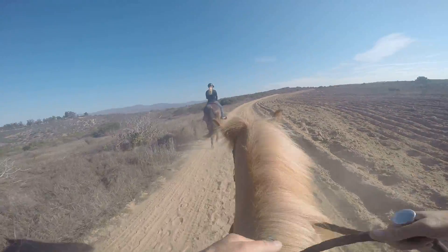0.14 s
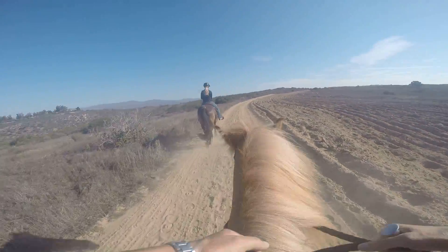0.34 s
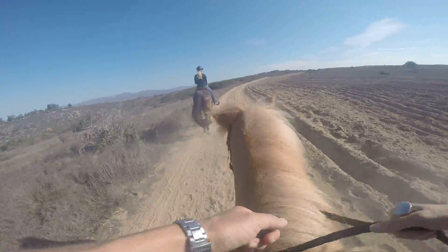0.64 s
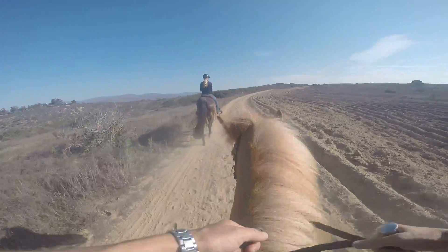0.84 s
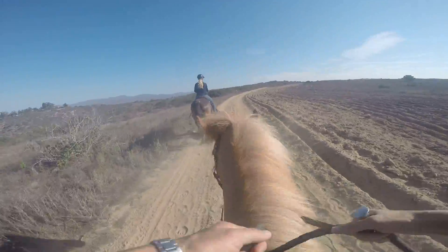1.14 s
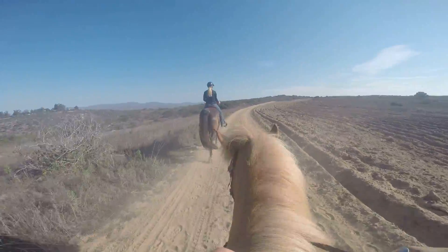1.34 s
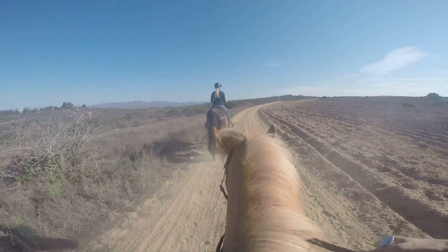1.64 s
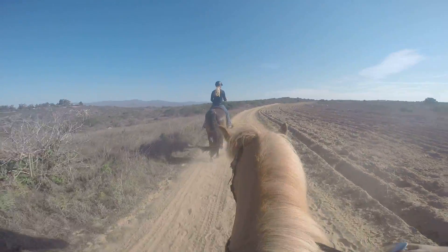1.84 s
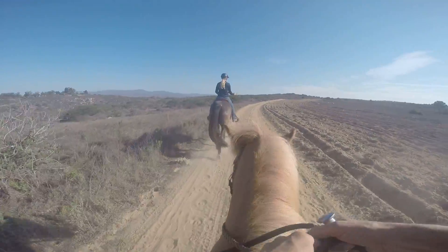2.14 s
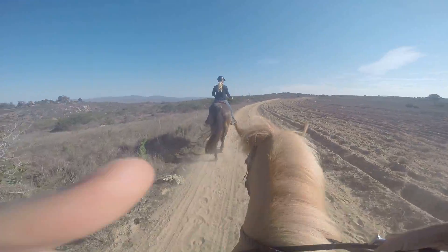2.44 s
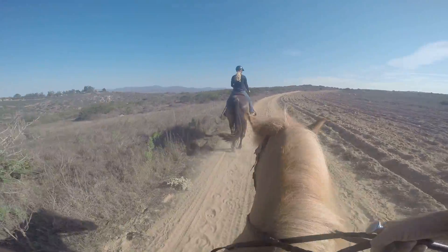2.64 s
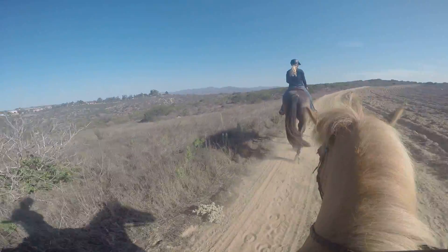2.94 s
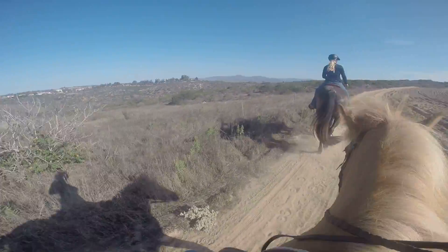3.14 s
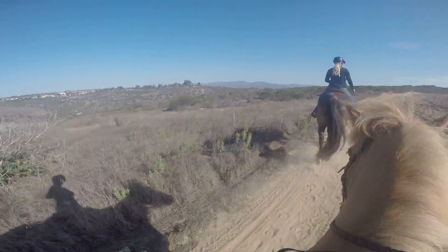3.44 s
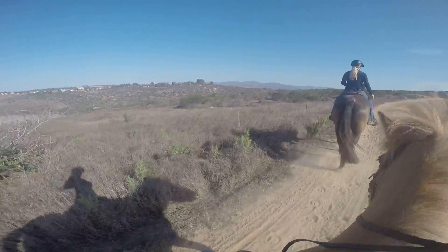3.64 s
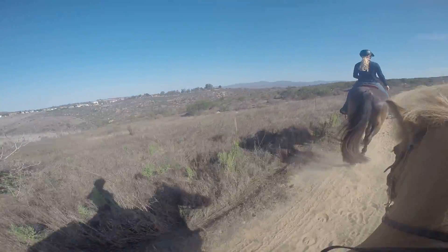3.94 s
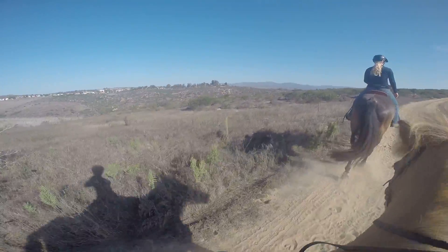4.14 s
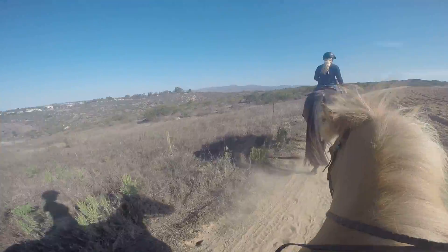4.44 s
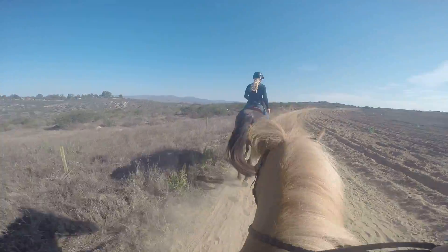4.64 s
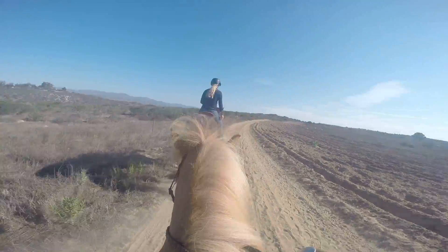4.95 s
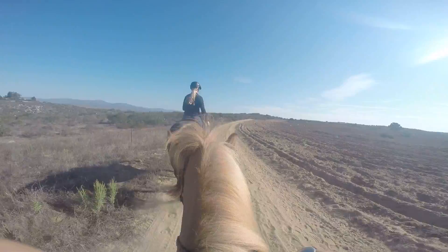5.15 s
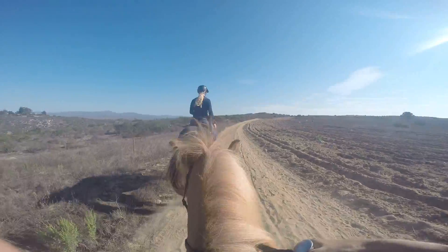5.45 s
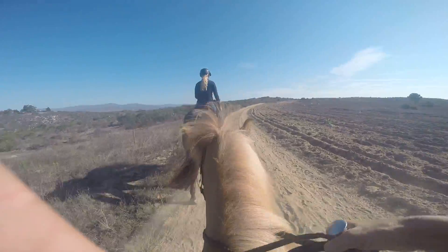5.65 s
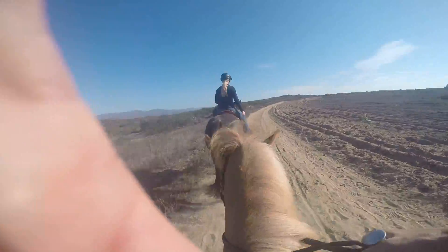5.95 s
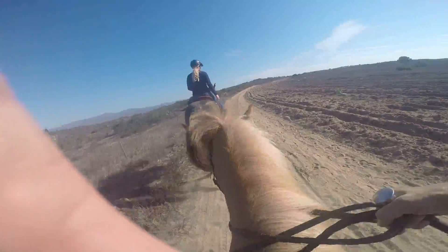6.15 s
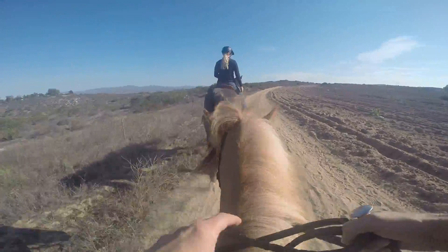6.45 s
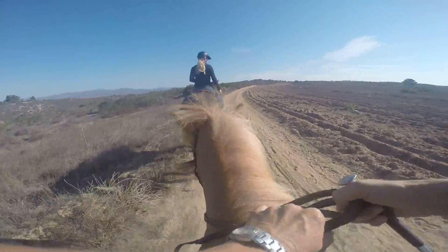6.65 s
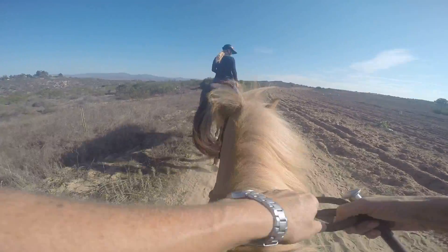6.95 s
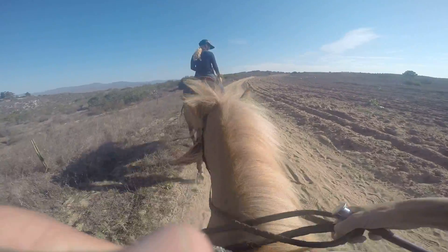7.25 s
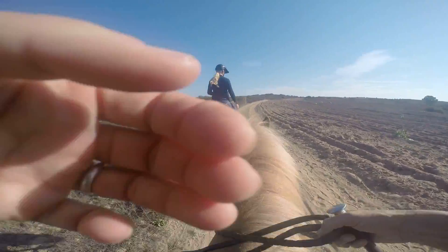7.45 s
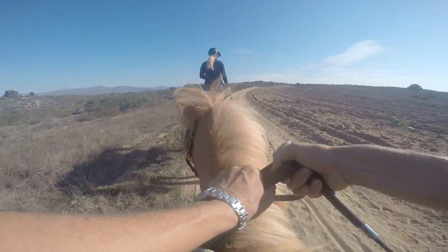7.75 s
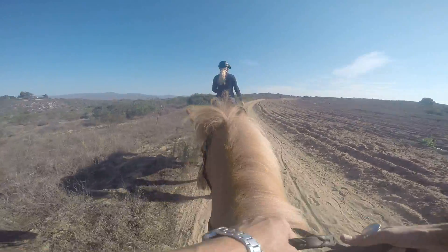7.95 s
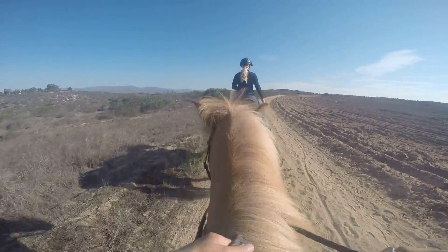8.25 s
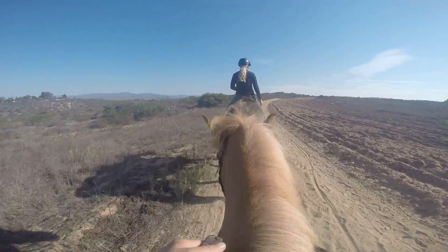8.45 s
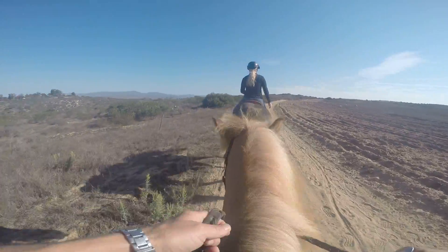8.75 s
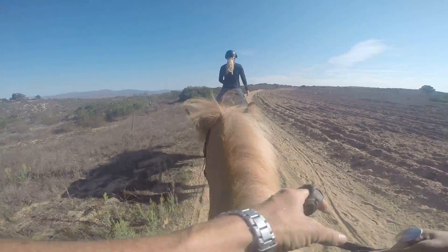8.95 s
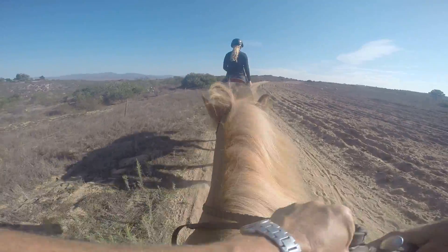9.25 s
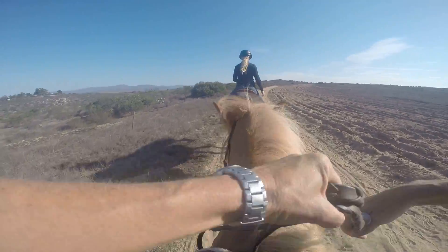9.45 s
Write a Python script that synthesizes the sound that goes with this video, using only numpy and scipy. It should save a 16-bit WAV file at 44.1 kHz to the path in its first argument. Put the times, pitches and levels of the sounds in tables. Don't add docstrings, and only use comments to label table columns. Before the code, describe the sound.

Low muffled trotting thumps on a cased camera give way to hard finger taps and scrapes on plastic, then thump again and fade.

```python
import sys
import numpy as np
from scipy import signal
from scipy.fft import rfft, irfft, next_fast_len
from scipy.io import wavfile

SR = 44100
rng = np.random.default_rng(int(sys.argv[2]) if len(sys.argv) > 2 else 0)


def waveform_to_disk(signal):
    frames = np.transpose(np.atleast_2d(signal))
    scaled = np.clip(frames, -1, 1) * 32767
    samples = np.round(scaled).astype(np.int16)
    wavfile.write(sys.argv[1], SR, samples)


def linear_from_db(decibels):
    return 10 ** (np.asarray(decibels, float) / 20)


N = 423801
T = np.arange(N) / SR

# crest t/s, crest level/dB, swing back share (up to about 1.3), strap puff level/dB, cloth swish
# level/dB
STRIDES = [(0.26, -7.5, 0.9, -41, -45), (0.518, -15.5, 1.16, -40, -46), (0.808, -11, 0.7, -40, -48.5),
           (1.051, -15, 0.8, -43, -47), (1.345, -5, 0.65, -38, -48), (1.612, -9.5, 1.01, -44.5, -45),
           (1.901, -13, 0.8, -42.5, -51), (2.146, -11.5, 1.1, -40.5, -49), (2.444, -24.5, 0.74, -55, -50),
           (6.271, -20, 1.34, -50, -54), (6.528, -16.5, 0.9, -36.5, -52.5), (6.805, -12.5, 0.3, -39, -48.5),
           (7.081, -17, 0.93, -37.5, -59), (7.943, -32.5, 0.5, -64, -73), (8.222, -32.5, 0.1, -59, -71),
           (8.491, -34, 0.9, -55.5, -64), (8.754, -28, 0.98, -57.5, -67), (9.015, -31.5, 1.17, -59.5, -67),
           (9.259, -40, 0.5, -59, -75.5)]
FIRST_STRIDE = (-0.004, -17, .8, -50, -51)
# t/s, level/dB, width/ms
SWAYS = [
    (4.133, -27.5, 36),
    (4.325, -26.5, 31),
    (4.646, -19.5, 36),
    (5.735, -27.5, 30),
    (6.111, -34, 22),
    (6.295, -21.5, 23),
    (7.866, -38, 22),
    (7.903, -32, 21),
]

# f/Hz, width/Hz, level when tapped/dB, level when rubbed/dB
SHELL = [(273, 149, -8, 5), (692, 129, -9, -2.5), (1063, 372, 6.5, -2.5), (1623, 300, -0.5, -6.5),
         (1814, 164, -19.5, -3.5), (2410, 377, 5, 0.5), (2890, 480, 3.5, -9), (3441, 293, -5, -1),
         (4434, 305, -20.5, -11.5), (5200, 360, -32, -22.5), (6530, 450, -32.5, -21.5)]
# t/s, peak level/dB, dull modes level/dB, bright crack level/dB, upper modes lift/dB
TAPS = [(2.6621, -26, -21, -24.5, 3), (2.6688, -24.5, -15.5, -23, -2), (2.6741, -25, -17.5, -28, 10),
        (2.7443, -19.5, -30, -15.5, 9), (2.834, -9, -7, -18, -0.5), (2.9077, -19, -7.5, -19, -2.5),
        (2.9237, -24, -18.5, -26, -1), (3.0168, -13.5, -15.5, -13, 10), (3.0727, -22.5, -19.5, -30, -2.5),
        (3.0759, 1, -9.5, -3, 3), (3.2674, -17, -19, -29.5, -3), (3.992, -16.5, -16, -28, -0.5),
        (4.0472, -20.5, -42, -25.5, -3), (4.2716, -16.5, -12.5, -35.5, -3.5), (4.6041, -11, -3, -49, -13),
        (4.6465, -16.5, -11, -28, -8), (4.8215, 2, -8, -15.5, -0.5), (5.0392, 3, -5.5, -11, 4.5),
        (5.1502, -18.5, -14.5, -40, 5), (5.6953, -27, -31.5, -29, 7), (5.7665, -23, -26.5, -25, 5),
        (5.9248, -13.5, -4, -20, -12), (5.9622, -6, -5, -11.5, -1), (6.3092, -28, -31, -30, -9),
        (7.497, -19, -30, -28, 4)]
# t/s, level/dB
PATS = [
    (2.879, -33),
    (3.534, -45),
    (3.7128, -40),
    (3.916, -39),
    (3.9508, -28.5),
    (4.325, -40),
    (4.4528, -26),
    (4.461, -23),
    (4.5268, -24),
    (4.8387, -22),
]
# t/s, level/dB
TOUCHES = [(2.737, -40), (3.0545, -39.5), (3.21, -55), (3.2272, -43), (3.3148, -41), (3.4036, -46.5),
           (3.578, -50), (3.669, -47), (3.7644, -38.5), (4.034, -23), (4.085, -42), (5.2047, -33.5),
           (5.2568, -38.5), (5.326, -32), (5.3519, -32.5), (5.3751, -36), (5.641, -37.5), (6.196, -41),
           (6.658, -36), (7.3639, -27.5), (9.2203, -30), (9.443, -47)]
# t/s, level/dB
TICKS = [
    (2.8713, -40),
    (3.6257, -34.5),
    (4.344, -30),
    (5.3992, -24),
    (8.7814, -37.5),
    (8.9501, -31.5),
    (9.1281, -33.5),
    (9.207, -46),
    (9.273, -35.5),
    (9.4542, -34),
]
# t/s, level/dB
DABS = [
    (4.0099, -22),
    (4.8469, -15),
    (5.0245, -17.5),
    (5.3105, -17),
]
# bright modes level/dB, dull modes level/dB, crack level/dB
PAT, TOUCH, TICK, DAB = (-9, .1, -35.5), (.1, -2.1, -22), (-8, -25, .1), (0.11, -1.88, -34)
# t/s, f/Hz
RINGS = [
    (8.781, 7500),
    (8.95, 5500),
    (9.128, 5500),
    (9.273, 3900),
    (9.454, 5550),
]
# t/s, favoured f/Hz, level/dB, stilled f/Hz, level/dB
SPOTS = [(2.744, 1580, 13, 850, -11), (2.908, 2900, 4.5, 1800, -8), (2.924, 3900, 6, 780, -8),
         (3.017, 1430, 9.5, 640, -17), (3.076, 2900, 3, 1880, -16.5), (3.267, 1800, 5, 1140, -4.5),
         (3.951, 700, 7, 1650, -11), (3.992, 530, 10.5, 1660, -3), (4.01, 1800, 4, 400, -12),
         (4.034, 780, 10, 1250, -8), (4.272, 3760, 9.5, 1520, -3), (4.527, 850, 9, 1620, -9),
         (4.604, 1350, 4.5, 990, -14), (4.647, 2080, 6.5, 1130, -14), (4.822, 4620, 9.5, 596, -12),
         (4.847, 700, 2.5, 540, -5), (5.039, 1680, 2, 630, -9), (5.15, 2100, 12, 1630, -10),
         (5.31, 1550, 7, 2150, -4), (5.695, 1490, 13, 880, -11), (5.766, 1710, 15, 1060, -8.5),
         (5.925, 1860, 6.5, 1030, -13), (5.962, 4120, 9.5, 1620, -6), (7.364, 1620, 12.5, 2150, -11),
         (7.497, 1510, 12, 3000, -9), (9.22, 1710, 14, 1050, -10), (9.22, 3390, 12, 2930, -15),
         (9.22, 2420, 2, 3950, -12)]

# t/s, level/dB, f/Hz, t60/ms
PUSHES = [(1.573, -21, 45, 75), (2.669, -15, 810, 14), (2.908, -27, 820, 20), (3.2676, -26, 557, 33),
          (4.272, -26, 720, 21), (5.794, -40.5, 502, 88), (2.68, -11, 110, 29), (4.079, -23, 100, 27),
          (7.378, -20, 24, 130), (7.505, -33.5, 283, 56), (2.6707, -0.5, 190, 20), (2.748, -13.5, 50, 180),
          (2.834, -23, 177, 50), (3.021, -16, 40.2, 64), (3.079, -19.5, 39.2, 59), (3.265, -27.5, 131, 85),
          (3.95, -31, 133, 320), (4.2727, -16, 145, 68), (4.529, -12, 120, 57), (4.609, -22, 104.7, 200),
          (4.647, 1, 163, 9.7), (4.691, -21.5, 50.4, 180), (4.822, -27, 240, 28), (5.15, -12, 147, 13),
          (5.79, -29.5, 97, 80), (5.823, -24.5, 79, 70), (5.964, -14, 140, 49), (6.542, -16.5, 62, 110),
          (6.549, -10, 160, 16.5), (7.3638, -7.5, 100, 84), (7.4965, -9, 90, 75), (9.222, -30.5, 178, 35)]
# t/s, level/dB, f/Hz, t60/ms
RELEASES = [(2.6651, -9, 89, 103), (2.69, -17.5, 68.5, 76), (2.756, -21.5, 94, 74),
            (2.913, -17.5, 127, 137), (3.016, -1, 93, 14.4), (3.073, -12, 104, 36),
            (3.7529, -23.5, 107.4, 34), (3.994, -15.5, 160, 16), (4.419, -21, 134, 17),
            (4.46, -21, 140, 62), (4.848, -23.5, 128, 59), (5.3106, -18, 288, 15),
            (5.3998, -31.5, 141, 110), (5.6438, -22.5, 90.5, 63), (5.925, -8.5, 270, 28),
            (7.362, -12, 172, 68), (7.3699, -14, 63.6, 120), (7.502, -7.5, 131, 26)]
# t/s, peak level/dB, f/Hz
HOOVES = [(0.247, -25, 110), (0.7805, -20, 65), (0.7968, -23, 109), (1.32, -19.5, 130), (1.878, -22, 128),
          (6.262, -27, 45), (6.5205, -28, 65), (6.7856, -26, 129), (6.814, -25.5, 93), (0.505, -37, 129),
          (0.788, -30, 125), (0.9, -36, 160), (1.03, -35, 121), (1.313, -25, 110), (1.335, -20, 150),
          (1.706, -36, 159), (1.876, -30, 130), (1.885, -37, 260), (2.105, -30, 130), (2.135, -29, 171),
          (3.875, -33, 143), (4.03, -25, 74.6), (4.315, -31, 122), (5.03, -26.5, 131), (5.69, -29.5, 153),
          (6.25, -37, 110), (6.3, -34.5, 200), (6.79, -30, 129), (6.82, -23.5, 99), (7.05, -30, 110),
          (7.08, -36, 200), (7.894, -44, 145), (8.208, -47, 110)]
# t/s, peak level/dB, f/Hz
DOWNWARD_BUMPS = [(0.2195, -38, 44.7), (0.232, -21, 77.4), (0.512, -26, 55), (1.2976, -21.5, 55), (1.329, -15.5, 65),
                  (1.3401, -18, 130), (1.5733, -27, 110), (1.58, -23, 55), (2.1105, -28, 55), (2.145, -26, 78),
                  (7.084, -23, 55), (7.855, -41, 45)]

# t/s, level/dB
SLIPS = [
    (2.872, -40),
    (3.017, -19.5),
    (3.0764, -22.5),
    (3.2678, -43.5),
    (3.6248, -30.5),
    (4.329, -46),
    (4.344, -27),
]
# t/s, pressure as level/dB
RUB = [(0.0, -60.5), (1.34, -53), (2.48, -56.5), (2.94, -46.5), (3.15, -69), (3.7, -64), (3.96, -59),
       (4.12, -58.5), (4.41, -54.5), (4.68, -48), (5.17, -51), (5.21, -53), (5.4, -45), (5.62, -56),
       (5.78, -55.5), (7.47, -51), (7.91, -62), (9.6, -64)]
# top t/s, rise/ms, fall/ms, rub level/dB,
# bright hiss level/dB
STROKES = [(2.836, 73, 7.1, -53, -62.5), (3.017, 76, 6.5, -53, -77.5), (3.108, 24, 24, -48, -75.5),
           (3.995, 29, 33, -36, -58), (4.045, 49, 27, -32.5, -54.5), (4.64, 73, 18, -35, -55),
           (5.135, 52, 52, -49, -84), (5.408, 9.5, 14, -37.5, -48), (5.512, 30, 9.6, -36.5, -41),
           (5.728, 54, 14, -49, -64), (5.805, 26, 37, -39.5, -53), (5.915, 49, 24, -34.5, -44.5),
           (6.119, 20, 11, -37.5, -46.5), (6.274, 27, 11.6, -34.5, -46), (6.06, 22, 28, -56.5, -65),
           (6.21, 22, 30, -47.5, -56.5), (6.812, 16, 7, -43, -52), (2.8, 40, 30, -52.5, -64.5),
           (4.8, 22, 5, -49.5, -63), (6.54, 17, 11, -39, -52), (6.65, 42, 35, -48, -67),
           (4.74, 74, 60, -52, -63.5), (7.233, 65, 23, -50, -61.5), (7.37, 12, 24, -40, -54.5),
           (7.4, 23, 28, -52, -60), (9.21, 69, 22, -49.5, -70), (9.488, 47, 51, -56, -73)]
# t/s, rub level/dB, bright hiss level/dB
SCUFFS = [
    (2.669, -37, -50),
    (2.749, -37, -46),
    (4.456, -42.5, -75),
    (5.033, -51, -69),
    (5.963, -32, -64),
    (7.506, -34, -44.5),
]
# t/s, rub level/dB
SHIFTS = [(3.253, -51.5), (3.347, -48), (3.505, -47), (3.6, -56), (3.633, -49), (3.817, -45), (3.891, -46),
          (4.172, -53.5), (5.32, -50), (7.627, -49), (7.75, -55), (8.195, -56.5), (7.88, -55)]
# t/s, level/dB
CUP = [
    (0.0, 0.4),
    (3.0, 1.5),
    (3.3, 8),
    (4.1, 9),
    (4.4, 3.5),
    (5.7, 3),
    (6.3, 5.5),
    (6.5, 3),
    (9.6, -0.5),
]
# f/Hz, level per Hz/dB
RUB_COLOUR = [(150, -30.5), (400, -4), (1800, -2.5), (2600, 7), (4500, -32.5), (7500, -28.5), (8500, -50)]
# f/Hz, level per Hz/dB
HISS_COLOUR = [(3500, -25), (5000, 1), (7300, 0.5), (8500, -14), (10300, -6.5), (13200, -23), (15000, -20),
               (15800, -33.5)]
# start t/s, end t/s, f/Hz, level/dB
WHISKS = [
    (7.36, 7.445, 6700, -56),
    (7.38, 7.45, 8600, -57),
    (5.485, 5.525, 8200, -51),
]

# t/s, level/dB
SHAKE = [(0.0, -44), (1.6, -39.5), (2.51, -40), (2.86, -29.5), (3.26, -57), (3.6, -39.5), (4.0, -42.5),
         (4.63, -42.5), (5.11, -41.5), (5.6, -50.5), (5.85, -33), (6.2, -50), (7.52, -40), (7.73, -53.5),
         (9.3, -56), (9.61, -42.5)]

# f/Hz, level per Hz/dB
FLOOR = [(18, -18.5), (30, 3.5), (81, -16.5), (400, -19.5), (1280, -26.5), (2000, -30), (2450, -30),
         (4650, -39), (5740, -36), (6400, -42.5), (9200, -45), (11700, -45.5), (13300, -55), (14800, -51.5),
         (15300, -88)]
# start t/s, end t/s, base f/Hz
CHIRPS = [
    (0.276, 0.347, 3350),
    (.704, 0.77, 3370),
    (8.969, 9.048, 3325),
    (9.435, 9.513, 3370),
]
# multiple, rms level/dB
CHIRP_ORDERS = [(2, -63), (3, -67), (4, -76)]
# f/Hz, locked line f/Hz, blanking blip f/Hz, rms level/dB
SENSOR = [
    (5851, 5844, 5655, -71.5),
    (11706, 11718, 11300, -71.5),
]
# t/s, gain just after as level/dB
OVERLOADS = [
    (3.016, -16.5),
    (3.075, -15),
    (4.823, -14.5),
    (5.04, -18.5),
    (5.963, -5.5),
]


def jolts():
    width_at_0db_ms, softer_ms_per_db = 14.6, 0.5
    pull_before, sway_back = 0.56, 0.3
    out = np.zeros(N)
    shudder = rms_one(band(rng.standard_normal(N), 58, 154))
    rows = [(s, db, width_at_0db_ms - softer_ms_per_db * db, back)
            for s, db, back, *rest in [FIRST_STRIDE, *STRIDES]]
    rows += [(*row, sway_back) for row in SWAYS]
    for s, crest_db, width_ms, back in rows:
        near = slice(max(int((s - .1) * SR), 0), int((s + .1) * SR))
        u = (T[near] - s) * 1000 / width_ms
        crest = np.exp(-np.where(u < .15, 2.4, 12.0) * np.abs(u - .15) ** 2.7)
        pull = pull_before * np.exp(-4.5 * (u + 1.03) ** 2)
        swing = 1.35 * back * np.exp(-7.5 * (u - .8) ** 2)
        rebound = 0.12 * np.exp(-.9 * (u - 2.6) ** 2)
        shaken = 0.081 * shudder[near] * np.exp(-1.6 * (u + 0.55) ** 2)
        out[near] += linear_from_db(crest_db - 1.95) * (crest - pull - swing + rebound + shaken)
    return out


def taps():
    size = SR // 20
    out, t = np.zeros(N + SR), T[:size]
    rows = all_taps()
    luck = rng.normal(0, 1, (len(rows), len(SHELL)))
    cracks = tap_cracks(rows, luck, t)
    hz, width_hz, level_db = np.transpose(SHELL)[:3, :, None]
    dull, upper = hz[:, 0] < 1800, hz > 2600
    softness = (1 - np.exp(-t / 0.00066)) ** 2
    for row, chance, crack in zip(rows, luck[:, :, None], cracks):
        s, peak_db, dull_db, crack_db, upper_db = row
        detuned_hz = hz * (1 + 0.022 * chance[::-1])
        waves = np.sin(2 * np.pi * detuned_hz * t) * np.exp(-np.pi * .75 * width_hz * t)
        waves = waves * linear_from_db(level_db + upper_db * upper + 1.1 * chance) * softness
        bright = at_peak(waves[~dull].sum(axis=0), peak_db + 0.19)
        low = at_peak(waves[dull].sum(axis=0), dull_db + 0.57)
        snap = at_peak(crack, crack_db - 4.5)
        at = int(s * SR)
        out[at:at + size] += landing(bright + low, s, crack_db - max(peak_db, dull_db)) + snap
    return out[:N]


def all_taps():
    rows = list(TAPS)
    for events, share in [(PATS, PAT), (TOUCHES, TOUCH), (TICKS, TICK), (DABS, DAB)]:
        rows += [(s, *(db + np.array(share)), 0) for s, db in events]
    return rows


def tap_cracks(rows, luck, t):
    ring_hz, ring_decay_s, ring_share = 5710, 0.0018, .6
    noise = rng.standard_normal((len(rows), len(t)))
    bursts = band(band(noise, 4100, 7400), 2700, 11000) * np.exp(-t / 0.0015)
    decay = np.exp(-t / ring_decay_s)
    tones = np.sin(2 * np.pi * ring_hz * (1 + 0.034 * luck[:, :1]) * t) * decay
    times = np.array(rows)[:, 0]
    for s, hz in RINGS:
        tones[np.argmin(np.abs(times - s))] = 2 * np.sin(2 * np.pi * hz * t) * decay
    return bursts / np.abs(bursts).max(axis=1, keepdims=True) + ring_share * tones


def landing(body, s, crack_db):
    soft_hz, soft_db, hard_db = 3264, -37, -22.5
    for spot_s, lift_hz, lift_db, still_hz, still_db in SPOTS:
        if abs(spot_s - s) < .005:
            body = tint(tint(body, lift_hz, lift_db), still_hz, still_db)
    hard = np.clip((crack_db - soft_db) / (hard_db - soft_db), 0, 1)
    dulled = signal.sosfilt(signal.butter(4, soft_hz, fs=SR, output="sos"), body)
    return hard * body + (1 - hard) * dulled


def knocks():
    out, t = np.zeros(N + SR), T[:SR // 2]
    for direction, rows in [(1, PUSHES), (-1, RELEASES)]:
        for s, level_db, hz, t60_ms in rows:
            wave = np.sin(2 * np.pi * hz * t) * linear_from_db(-60000 * t / t60_ms) * (1 - np.exp(-t / .0006))
            at = int(s * SR)
            out[at:at + len(t)] += direction * linear_from_db(level_db + 3.5) * wave
    return out[:N]


def bounces():
    length_cycles, rise_cycles, lift_db = 7.5, .3, 6.0
    out, t = np.zeros(N + SR), T[:SR // 8]
    for direction, rows in [(1, HOOVES), (-1, DOWNWARD_BUMPS)]:
        for s, level_db, hz in rows:
            rise = (1 - np.exp(-t * hz / rise_cycles)) ** 2
            wave = np.sin(2 * np.pi * hz * t) * linear_from_db(-60 * t * hz / length_cycles) * rise
            at = int(s * SR)
            out[at:at + len(t)] += direction * linear_from_db(level_db + lift_db) * wave
    return out[:N]


def creak():
    start_s, end_s = 2.882, 2.911
    first_per_s, last_per_s = 240, 750
    first_db, last_db = -31.5, -17.5
    part = np.clip((T - start_s) / (end_s - start_s), 0, 1)
    live = (T >= start_s) & (T < end_s)
    phase = np.cumsum(live * first_per_s * (last_per_s / first_per_s) ** part / SR)
    pulses = np.exp(-4.5 * (phase % 1)) + 0.29 * part ** 2
    gate = live * pulses * linear_from_db(first_db + (last_db - first_db) * part)
    size = SR // 20
    for s, level_db in SLIPS:
        gate[int(s * SR):int(s * SR) + size] += linear_from_db(level_db) * np.exp(-T[:size] / 0.00098)
    return gate * rms_one(band(rng.standard_normal(N), 2800, 12000))


def rubbing():
    rub, hiss_level = stroke_levels()
    slips = rms_one(grains(5000, 3.14)) + 0.55 * rng.standard_normal(N)
    body = 0.74 * rms_one(band(rubbed_modes(slips), 180, 7000))
    body = body + 0.32 * coloured(rng.standard_normal(N), RUB_COLOUR)
    low = body - signal.sosfiltfilt(signal.butter(2, 1150, "high", fs=SR, output="sos"), body)
    thin = np.clip(6.1 * (hiss_level / rub - .16), 0, .97)
    hiss = coloured(grains(5500, 2.5), HISS_COLOUR)
    return linear_from_db(1.85 * flicker(40.4)) * (rub * (body - thin * low) + hiss_level * hiss)


def rubbed_modes(slips):
    grip_db, grip_hz = 2.3, 7.2
    cup_db, = in_time(CUP)
    out = np.zeros(N)
    for k, (hz, width_hz, tap_db, level_db) in enumerate(SHELL):
        cup_share = (1500 < hz < 2000) - .5 * (hz > 2800)
        gain = linear_from_db(level_db + grip_db * flicker(grip_hz) + cup_db * cup_share)
        out += (-1) ** k * gain * ring(slips, hz, 0.56 * width_hz) * width_hz
    return out


def stroke_levels():
    steady_db, = in_time(RUB)
    rub, hiss = linear_from_db(steady_db - 1.5) ** 2, linear_from_db(steady_db - 18.5) ** 2
    for s, rise_ms, fall_ms, rub_db, hiss_db in all_strokes():
        near = slice(max(int((s - .4) * SR), 0), int((s + .4) * SR))
        u = (T[near] - s) * 1000 / np.where(T[near] < s, rise_ms, fall_ms)
        shape = linear_from_db(-9.5 * np.abs(u) ** 2.18) ** 2
        rub[near] += linear_from_db(rub_db + 3.0) ** 2 * shape
        hiss[near] += linear_from_db(hiss_db + 1.3) ** 2 * shape
    return np.sqrt(rub), np.sqrt(hiss)


def all_strokes():
    rows = list(STROKES)
    rows += [(s, 6.4, 8.9, db, hiss_db) for s, db, hiss_db in SCUFFS]
    rows += [(s, 31, 24, db, db - 22.5) for s, db in SHIFTS]
    for s, crest_db, back, puff_db, swish_db in [FIRST_STRIDE, *STRIDES]:
        rows.append((s + 0.0035, 25, 17, puff_db, puff_db - 15.5))
        rows.append((s + 0.11, 77, 28.5, swish_db, swish_db - 17.5))
    return rows


def whisks():
    out = np.zeros(N)
    for start, end, hz, level_db in WHISKS:
        near = slice(int(start * SR), int(end * SR))
        swell = np.sqrt(np.abs(np.sin(np.pi * (T[near] - start) / (end - start))))
        out[near] += linear_from_db(level_db) * swell * rms_one(ring(rng.standard_normal(N)[near], hz, 380))
    return out


def shaking():
    rumble_db, = in_time(SHAKE)
    drum_db = -50.5 + .6 * (rumble_db + 45.5)
    rumble = rms_one(band(rng.standard_normal(N), 22.0, 45)) * linear_from_db(4.5 * flicker(11))
    drum = rms_one(ring(band(grains(150, 4.06), 63, 450), 110, 82))
    return linear_from_db(rumble_db - 6.0) * rumble + linear_from_db(drum_db - 0.56) * drum


def circuit():
    out = linear_from_db(-51) * coloured(rng.standard_normal(N), FLOOR) + sensor()
    wobble = 1 + 0.0042 * flicker(60)
    for start, end, hz in CHIRPS:
        near = slice(int(start * SR), int(end * SR))
        since, left = T[near] - start, end - T[near]
        sharp = 0.029 * (np.exp(-since / 0.0052) + np.exp(-left / 0.0036))
        phase = 2 * np.pi * np.cumsum(hz * (wobble[near] + sharp)) / SR
        gate = np.clip(np.minimum(since, left) / .002, 0, 1)
        for k, level_db in CHIRP_ORDERS:
            out[near] += gate * np.sqrt(2) * linear_from_db(level_db) * np.sin(k * phase)
    return out


def sensor():
    frames_per_s, frame_start, restart_s = 29.97, .36, 0.0021
    blip_share, blip_db = 0.38, -4
    pilot_hz, pilot_lock_hz, pilot_db = 14640, 14626, -81
    part = (T * frames_per_s - frame_start) % 1
    since = part / frames_per_s
    blip = np.sin(np.pi * np.minimum(part / blip_share, 1))
    dip = np.minimum(np.minimum(part, 1 - part) / frames_per_s / restart_s, 1)

    def whine(hz, lock_hz):
        return dip * np.sin(2 * np.pi * (hz * since + lock_hz * (T - since)))

    out = linear_from_db(pilot_db) * whine(pilot_hz, pilot_lock_hz)
    for hz, lock_hz, blip_hz, level_db in SENSOR:
        low_blip = linear_from_db(blip_db) * blip * np.sin(2 * np.pi * blip_hz * T)
        out = out + linear_from_db(level_db) * (whine(hz, lock_hz) + low_blip)
    return np.sqrt(2) * out


def ducking():
    hold_s, rise_db_per_s = 0.31, 17
    gain_db = np.zeros(N)
    for s, drop_db in OVERLOADS:
        climb = drop_db + rise_db_per_s * np.maximum(T - s - hold_s, 0)
        gain_db = np.minimum(gain_db, np.where(T > s, climb, 0))
    return linear_from_db(gain_db)


def in_time(rows):
    s, *columns = np.transpose(rows)
    return [np.interp(T, s, c) for c in columns]


def rms_one(x):
    return x / np.sqrt(np.mean(x ** 2) + 1e-20)


def at_peak(x, peak_db):
    return linear_from_db(peak_db) * x / np.abs(x).max()


def coloured(x, spectrum):
    hz, level_db = np.transpose(spectrum)
    size = next_fast_len(N)
    bins = np.arange(size // 2 + 1) * SR / size + 1
    gain = linear_from_db(np.interp(np.log(bins), np.log(hz), level_db, left=-80, right=-80))
    return rms_one(irfft(rfft(x, size) * gain, size)[:N])


def band(x, low_hz, high_hz):
    return signal.sosfilt(signal.butter(2, [low_hz, high_hz], "band", fs=SR, output="sos"), x)


def ring(clicks, hz, width_hz):
    r, w = np.exp(-np.pi * width_hz / SR), 2 * np.pi * hz / SR
    return signal.lfilter([0, np.sin(w)], [1, -2 * r * np.cos(w), r * r], clicks + 1e-18)


def tint(x, hz, gain_db):
    a, w = linear_from_db(gain_db / 2), 2 * np.pi * hz / SR
    q = np.sin(w) / (2 * 3.5)
    top = [1 + q * a, -2 * np.cos(w), 1 - q * a]
    bottom = [1 + q / a, -2 * np.cos(w), 1 - q / a]
    return signal.lfilter(top, bottom, x)


def grains(per_s, spread_db):
    sizes = linear_from_db(spread_db * np.minimum(rng.exponential(1, N), 5)) * rng.choice([-1, 1], N)
    return sizes * (rng.random(N) < per_s / SR)


def flicker(rate_hz):
    r = np.exp(-2 * np.pi * rate_hz / SR)
    noise = rng.standard_normal(N + SR)
    return rms_one(signal.lfilter([1], [1, -2 * r, r * r], noise)[SR:])


def scene():
    handling = taps() + knocks() + bounces() + creak() + rubbing()
    return (jolts() + handling + whisks() + shaking() + ducking() * circuit())[None]


def starve(x):
    low_edge_hz, high_edge_hz = 12000, 12700
    low_limit_db, high_limit_db = -9, .5
    hz, s, cells = signal.stft(x[0], SR, nperseg=2048)
    power = (np.abs(cells[:1024]) ** 2).reshape(64, 16, -1).mean(axis=1)
    edge = hz[:1024:16, None]
    usual = np.median(power[edge[:, 0] > high_edge_hz][:5])
    limit_db = np.where(edge > high_edge_hz, high_limit_db, low_limit_db)
    limit = usual * linear_from_db(limit_db + rng.normal(0, 2, power.shape)) ** 2
    cells[:1024] *= np.repeat((power < limit) & (edge > low_edge_hz), 16, axis=0)
    cells[1024:] = 0
    lost = signal.istft(cells, SR, nperseg=2048)[1][:N]
    return x - lost


def band_limit(x):
    return signal.sosfilt(signal.butter(12, 16440, fs=SR, output="sos"), x)


def record(dry):
    rounded = dry / (1 + dry ** 12) ** (1 / 12)
    cut = signal.sosfilt(signal.butter(8, 15900, fs=SR, output="sos"), rounded)
    mix = np.clip(starve(cut), -1, 1)
    return band_limit(mix)


dry = scene()
out = record(dry)
waveform_to_disk(out)
```